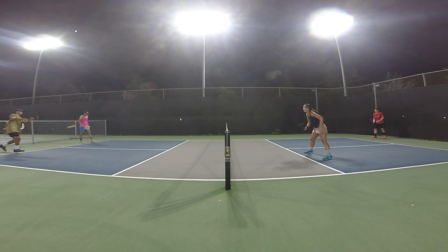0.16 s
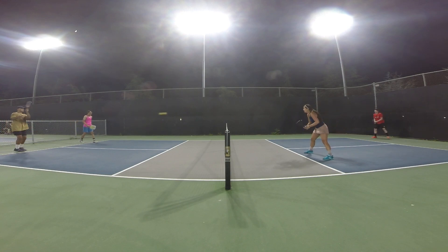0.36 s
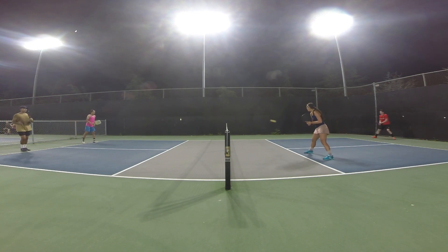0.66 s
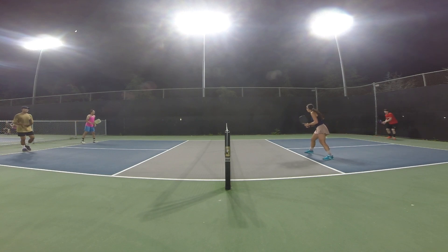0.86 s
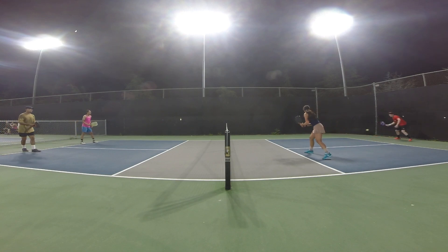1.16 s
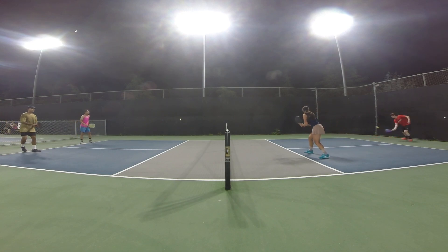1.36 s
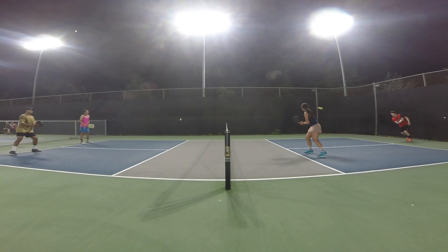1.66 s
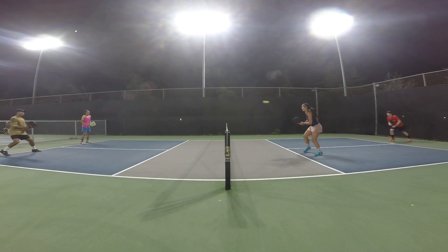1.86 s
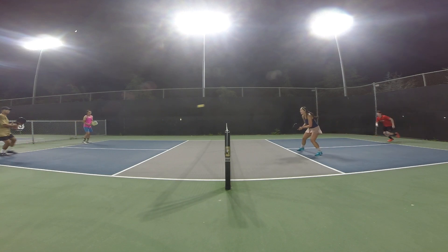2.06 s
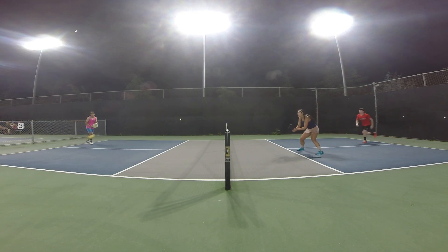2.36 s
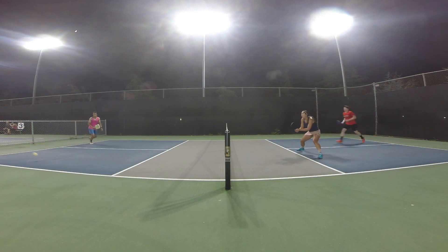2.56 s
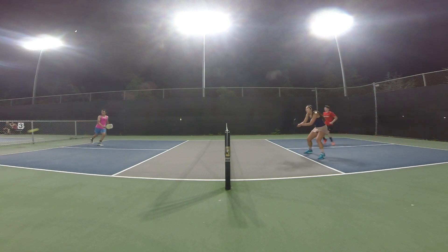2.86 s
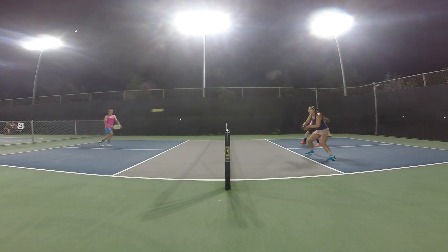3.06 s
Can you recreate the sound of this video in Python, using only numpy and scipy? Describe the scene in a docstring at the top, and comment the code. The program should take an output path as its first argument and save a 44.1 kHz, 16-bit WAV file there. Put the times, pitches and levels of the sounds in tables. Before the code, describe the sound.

A pickleball rally on a fenced outdoor court. A dull bounce at 0.13 s leads into a sharp hollow paddle pock at 0.19, with wall echoes; further pocks come at 1.43 and 2.9, the last bright and ringing. Shoes scuff lightly throughout, footfalls tap from 1.1, strongest at 2.77, small clicks near 1.0 and 2.6, short squeaks after 2.87. A low engine hum fades, wavering, under quiet night air.

```python
"""A fenced outdoor court at night, with a pickleball rally over the fading hum of what is probably a distant engine.
The engine is a firing tone, weaker lines and throbbing rumble; the night air is shaped noise.
Each ball impact is a hard kick, a release and a short ring of the ball or of that paddle's own modes.
Filtered copies come back from fences and walls, and a diffuse noise tail spreads round the court.
Between the hits, shoes tap (struck resonances), scuff (sliding hiss) and squeak (falling chirps), and ticks click."""
import sys
import numpy as np
from scipy import signal
from scipy.fft import rfft, irfft
from scipy.io import wavfile
from scipy.ndimage import uniform_filter1d

SR = 44100
rng = np.random.default_rng(int(sys.argv[2]) if len(sys.argv) > 2 else 0)


def dump_mix(stems):
    """Bounce the given channels to the path in sys.argv[1] as a 16-bit WAV at rate SR."""
    frames = np.atleast_2d(stems).T  # one column per channel
    limited = np.clip(frames, -1, 1)  # hard clip at full scale
    pcm = np.round(limited * 32767).astype(np.int16)
    wavfile.write(sys.argv[1], SR, pcm)


N = 141120  # samples, 3.2 s
T = np.arange(N) / SR
TOP_HZ = 15400  # upper edge of the whole sound


def amp(db):
    """Decibels to gain."""
    return 10 ** (np.asarray(db) / 20)


def unit(x):
    """Scale to rms 1."""
    return x / np.sqrt(np.mean(x ** 2))


def noise():
    """White noise."""
    return rng.standard_normal(N)


def fade(t60):
    """Exponential decay that falls 60 dB in t60 seconds."""
    return np.exp(-np.log(1000) * T / t60)


def band(x, hz, width):
    """Resonance with gain 1 at its centre."""
    g = np.tan(np.pi * min(hz, SR / 2 - 2000) / SR)
    k = width / hz
    numerator = [g * k, 0, -g * k]
    denominator = [1 + g * k + g * g, 2 * (g * g - 1), 1 - g * k + g * g]
    return signal.lfilter(numerator, denominator, x)


def soften(x, hz, order=2):
    """Low-pass."""
    return signal.sosfilt(signal.butter(order, min(hz, TOP_HZ), fs=SR, output="sos"), x)


def delay(x, s):
    """The sound, s seconds later."""
    return np.concatenate([np.zeros(max(int(s * SR), 0)), x])[:N]


def walk(rate):
    """Smooth random wander with a spread near 1, heading for a new value rate times a second."""
    k = max(int(SR / rate), 1)
    return uniform_filter1d(np.repeat(rng.standard_normal(N // k + 1), k), k)[:N]


def coloured(points):
    """Noise of rms 1 with a spectrum of (Hz, dB) points."""
    hz, db = np.array(points).T
    f = np.maximum(np.fft.rfftfreq(N, 1 / SR), 1)
    gain = amp(np.interp(np.log(f), np.log(hz), db))
    return unit(irfft(rfft(noise()) * gain, N))


# pitch glide of the engine: time_s, firing_hz
ENGINE_PITCH = [(0, 132.7), (.6, 131.2), (1.2, 132.7), (1.55, 128.7), (2.4, 129.8), (2.75, 125.5),
                (3.2, 125.1)]
# loudness ride of the engine: time_s, tone_db, lines_and_rumble_db
ENGINE_LEVEL = [(0, 1.5, 4.5), (.45, 2, 4), (.75, 1, 0.5), (1.15, -2, 1), (1.55, -6, -11), (2.0, -9.5, -11),
                (2.25, -3, -6), (2.55, -9.5, -6), (2.8, -2, -7), (3.2, -5.5, -9.5)]
# weaker exhaust lines: multiple of the eight-firing cycle, level_db
EXHAUST_LINES = [(5, -43), (11, -44.5), (12, -48.5), (13, -42.5), (17, -47), (19, -59), (25, -52)]
# spectral shape of the exhaust rumble: freq_hz, relative_db
EXHAUST_COLOUR = [(30, -16), (70, -10), (150, -1.5), (280, 2.5), (420, -4), (700, -14), (1500, -34.5),
                  (4000, -54)]
FIRING_DB, RUMBLE_DB = -34, -39.5  # before the loudness ride


def engine():
    """The firing tone, weaker wavering lines on the engine cycle, and rumble that throbs with the firings."""
    time_s, tone_db, rest_db = np.array(ENGINE_LEVEL).T
    firing_hz = np.interp(T, *np.array(ENGINE_PITCH).T)
    firing = 2 * np.pi * np.cumsum(firing_hz) / SR
    cycle = firing / 8
    tone = amp(FIRING_DB + 1.66 * walk(12)) * np.sqrt(2) * np.sin(firing + 0.027 * walk(27))
    lines = np.zeros(N)
    for multiple, db in EXHAUST_LINES:
        level = amp(db + 3.7 * walk(6.87))
        phase = 0.57 * walk(8.3) + rng.uniform(0, 2 * np.pi)
        lines += level * np.sqrt(2) * np.sin(round(multiple) * cycle + phase)
    rumble = amp(RUMBLE_DB) * coloured(EXHAUST_COLOUR) * (1 + 0.3 * np.sin(firing))
    tone_ride = amp(np.interp(T, time_s, tone_db))
    rest_ride = amp(np.interp(T, time_s, rest_db))
    return tone * tone_ride + (lines + rumble) * rest_ride


# spectral shape of the night air: freq_hz, relative_db
AIR_COLOUR = [(15, -55), (25, -3), (137, -0.5), (175, -4), (285, -8), (405, -17), (1070, -18),
              (3720, -34.5), (11600, -51), (14400, -56), (16000, -86)]


def night_air():
    """Steady noise, weighted to the lows."""
    return amp(-40.5) * coloured(AIR_COLOUR)


KNOCK_WIDTH = 0.99  # share of the knock's pitch
CRACK_T60_S, CRACK_HZ, CRACK_WIDTH_HZ = 0.015, 5400, 3850
GROUND_LAG_S, GROUND_DB = 0.0025, -16.5  # the court mirrors each impact
KNOCK_SPREAD_DB, SKIN_SPREAD_DB = 0.5, -10  # shares that spread round the court


def impact(modes, knock_db, knock_hz, contact_ms, release_db, ring_db, crack_db, top_hz):
    """The ball kicks what it strikes and kicks back as it leaves; face (first mode) and skin (the rest) ring.

    Returns the direct sound with its ground reflection, and what spreads round the court."""
    kick = soften(signal.unit_impulse(N), top_hz, order=1)
    knock = amp(knock_db) * band(kick, knock_hz, KNOCK_WIDTH * knock_hz)
    release = -amp(release_db) * delay(knock, contact_ms / 1000)
    face, *skin_modes = [amp(ring_db + db) * band(kick, hz, width) for hz, width, db in modes]
    skin = sum(skin_modes)
    crack = amp(crack_db) * band(noise() * fade(CRACK_T60_S), CRACK_HZ, CRACK_WIDTH_HZ)
    pock = knock + release + face + skin + crack
    direct = pock + amp(GROUND_DB) * delay(pock, GROUND_LAG_S)
    spread = amp(KNOCK_SPREAD_DB) * knock + amp(SKIN_SPREAD_DB) * skin + face + crack
    return direct, spread


# ball impacts, a bounce on the court and three paddle hits: start_s, knock_db, knock_hz, contact_ms,
# release_db (relative to the knock), ring_db, crack_db, top_hz, tail_db
IMPACTS = [(0.1306, 19, 350, 0.7, 7, 24.5, -29, 2400, 11.5),
           (0.1919, 28, 443, 1.68, -13.5, 28, -9, 12100, -2),
           (1.4318, 29, 436, 2.264, -9.5, 29.5, -17, 8000, -1),
           (2.8984, 27.5, 404, 1.42, -13, 39.5, -6.5, 11000, -4)]
# modes of the bouncing ball and of each paddle, one list per impact: mode_hz, width_hz, level_db (on ring_db)
IMPACT_MODES = [
    [(1202, 50, 1), (2230, 53, -14)],
    [(984, 133, 2), (1670, 274, -1), (2520, 130, -6.5), (4350, 1500, -10.5), (7050, 400, -16)],
    [(1155, 47, -0.5), (810, 43, -8.5), (1650, 49, -16), (2670, 53, -15), (3800, 440, -18),
     (6500, 4500, -18)],
    [(1107, 120, -1.5), (1348, 245, -3.5), (1685, 150, -17), (2466, 120, -17.5), (3080, 99, -11),
     (5270, 900, -19.5), (7700, 150, -17.5)],
]


def rally():
    """Strikes each impact with its own modes; returns the hits, their court share and each pock from time 0."""
    hits, spread, pocks = np.zeros(N), np.zeros(N), []
    for modes, (start_s, *settings, tail_db) in zip(IMPACT_MODES, IMPACTS):
        pock, around = impact(modes, *settings)
        hits += delay(pock, start_s)
        spread += amp(tail_db) * delay(around, start_s)
        pocks.append(pock)
    return hits, spread, pocks


# reflections of the latest hit from fences and walls: arrival_s, level_db (relative to the hit), low_hz, high_hz
WALL_ECHOES = [(0.204, -16, 700, 2980), (0.224, -27.5, 1700, 13200), (0.2428, -10.5, 410, 2690),
               (0.303, -29, 935, 2870), (0.3285, -12, 650, 1390), (1.4531, -21, 2500, 13000),
               (1.497, -16, 1340, 2500), (1.529, -23, 1540, 4300), (1.604, -16.5, 250, 990),
               (2.9159, -17, 593, 1260), (2.9394, -20.5, 6700, 13000), (2.950, -31.5, 795, 1950),
               (3.02, -24, 520, 1090), (3.0419, -15, 252, 925)]


def echoes(pocks):
    """Fences and walls each throw back one band of the latest impact."""
    out = np.zeros(N)
    for arrival_s, db, low_hz, high_hz in WALL_ECHOES:
        latest = sum(row[0] < arrival_s for row in IMPACTS) - 1
        edges = sorted([low_hz, min(high_hz, TOP_HZ)])
        wall = signal.butter(3, edges, "band", fs=SR, output="sos")
        out += amp(db) * delay(signal.sosfilt(wall, pocks[latest]), arrival_s)
    return out


TAIL_RISE_S, TAIL_GRAIN_DB = 0.001, 3
# diffuse court tail by band: centre_hz, level_db, t60_s (before the source's t60 share)
COURT_TAIL = [(320, -12.5, 0.26), (1006, -11, 1.2), (2160, -9.5, 0.79), (4180, -17.5, 0.39),
              (9450, -15.5, 0.44), (13500, -10.5, 0.26)]


def court(x, t60_share):
    """Many small uneven reflections, longest in the midrange, as decaying bands of noise."""
    scatter = amp(TAIL_GRAIN_DB * walk(300)) * (1 - np.exp(-T / TAIL_RISE_S))
    response = np.zeros(N)
    for hz, db, t60 in COURT_TAIL:
        envelope = scatter * fade(t60 * t60_share)
        grain = band(band(noise() * envelope, hz, hz), hz, hz)
        response += amp(db) * grain / np.sqrt(np.sum(envelope ** 2))  # envelope energy 1
    return signal.fftconvolve(x, response)[:N]


SCUFF_ATTACK_S, SCUFF_RELEASE_S, SCUFF_GRAIN_DB = 0.016, 0.0088, 2
SCUFF_FALL = 1.05  # the hiss starts this factor above its centre and ends as far below
SCUFF_WIDTH_HZ, SCUFF_CENTRE_HZ = 3900, 5000  # width at this centre; low scrapes are narrow, high hisses broad
# soles sliding on the court: start_s, length_s, level_db, centre_hz
SOLE_SLIDES = [(0.433, 0.025, -43, 6670), (0.452, 0.065, -45.5, 3060), (0.753, 0.036, -53.5, 8600),
               (0.805, 0.13, -50.5, 2690), (0.92, 0.16, -55.5, 4440), (1.33, 0.27, -59.5, 4530),
               (1.59, .11, -61, 5500), (1.842, 0.033, -55, 6860), (2.069, 0.064, -51.5, 4700),
               (2.127, 0.084, -48.5, 3930), (2.558, 0.029, -50.5, 8000), (2.736, 0.028, -39, 6200),
               (2.756, 0.25, -49, 6000), (3.012, 0.19, -50.5, 6000), (3.086, 0.097, -43.5, 3800)]


def hiss(hz):
    """Friction noise of rms 1 around one pitch."""
    width = SCUFF_WIDTH_HZ * (hz / SCUFF_CENTRE_HZ) ** 2
    return unit(band(band(noise(), hz, width), hz, 4 * hz))


def scuffs():
    """Grainy friction that swells, darkens as the sole slows and dies away."""
    out = np.zeros(N)
    for start_s, length_s, db, hz in SOLE_SLIDES:
        swell = np.clip((T - start_s) / SCUFF_ATTACK_S, 0, 1)
        past_end_s = np.maximum(T - start_s - length_s + SCUFF_ATTACK_S, 0)
        envelope = swell * np.exp(-past_end_s / SCUFF_RELEASE_S)
        slowed = np.clip((T - start_s) / length_s, 0, 1)
        fast, slow = hiss(hz * SCUFF_FALL), hiss(hz / SCUFF_FALL)
        out += amp(db) * envelope * (np.sqrt(1 - slowed) * fast + np.sqrt(slowed) * slow)
    return out * amp(SCUFF_GRAIN_DB * walk(700) + 2 * walk(48))


CLICK_T60_S, CLICK_RING_HZ = 0.012, 2390
# small sharp clicks: start_s, level_db, ring_db (relative to the tick)
TICKS = [(1.02, -25, 9.5), (1.139, -41, 19), (2.6155, -27.5, 15.5)]


def clicks():
    """Bright noise ticks, each with a brief ring in a narrow band."""
    out = np.zeros(N)
    for start_s, db, ring_db in TICKS:
        tick = noise() * fade(CLICK_T60_S)
        ring = amp(ring_db) * band(tick, CLICK_RING_HZ, 240)
        out += amp(db) * delay(band(tick, 2100, 12000) + ring, start_s)
    return out


THUD_LAG_S, THUD_WIDTH, SLAP_T60_S = 0.001998, 0.34, 0.023  # width as a share of the thud's pitch
SOLE_HZ, SOLE_WIDTH_HZ, SOLE_DB = 537, 48, -11  # hollow clop of the sole, relative to the thud
THUMP_HZ, THUMP_WIDTH_HZ = 205, 104
# footfalls and ball bounces: start_s, thud_db, thud_hz, slap_db, slap_hz, thump_db
FOOTFALLS = [(1.082, -7.5, 885, -42, 1800, -3), (1.4002, 12.5, 650, -31.5, 2360, 3),
             (1.805, 9, 704, -34, 2550, 9), (1.833, 9.5, 653, -36.5, 2270, 9),
             (2.151, 11.5, 555, -29.5, 1430, 13), (2.179, 3, 554, -48, 1110, -9),
             (2.391, 5.5, 590, -39, 1900, -1), (2.614, 2, 510, -52, 2400, 3),
             (2.7716, 18.5, 574, -24.5, 2780, 26), (2.808, -10, 400, -31.5, 1700, 13.5)]


def steps():
    """A short slap on the hard court, then a dull thud with a hollow clop and the low thump of the weight."""
    out, kick = np.zeros(N), signal.unit_impulse(N)
    clop = band(band(kick, SOLE_HZ, SOLE_WIDTH_HZ), SOLE_HZ, 2 * SOLE_HZ)
    thump = band(band(kick, THUMP_HZ, THUMP_WIDTH_HZ), THUMP_HZ, 3 * THUMP_HZ)
    for start_s, thud_db, thud_hz, slap_db, slap_hz, thump_db in FOOTFALLS:
        thud = band(band(kick, thud_hz, THUD_WIDTH * thud_hz), thud_hz, 3 * thud_hz)
        thud += amp(SOLE_DB) * clop
        hard_noise = band(band(noise(), slap_hz, 0.5 * slap_hz), slap_hz, 1.06 * slap_hz)
        slap = amp(slap_db) * unit(hard_noise) * fade(SLAP_T60_S)
        weight = amp(thud_db) * thud + amp(thump_db) * thump
        out += delay(slap - delay(weight, THUD_LAG_S), start_s)
    return out


# rubber squeaks: start_s, length_s, start_hz, end_hz, level_db
RUBBER_SQUEAKS = [(2.874, 0.027, 2850, 2700, -37), (3.082, 0.017, 3350, 2770, -33.5),
                  (3.156, 0.0088, 2930, 2840, -24)]


def squeaks():
    """Rubber sticks and slips in a short falling chirp with a jittery pitch."""
    out = np.zeros(N)
    for start_s, length_s, start_hz, end_hz, db in RUBBER_SQUEAKS:
        progress = np.clip((T - start_s) / length_s, 0, 1)
        glide = start_hz + (end_hz - start_hz) * progress
        hz = glide * (1 + 0.028 * walk(900))
        out += amp(db) * np.sin(np.pi * progress) * np.sin(2 * np.pi * np.cumsum(hz) / SR)
    return out


SHOE_TAIL_DB, SHOE_T60_SHARE = 6, 0.92  # court tail of the shoes


def scene():
    """Rally and footwork in the court, over engine and night air; sounds at ground level die away sooner."""
    background = engine() + night_air()
    hits, spread, pocks = rally()
    shoes = scuffs() + steps() + squeaks()
    tail = court(spread, 1) + amp(SHOE_TAIL_DB) * court(shoes, SHOE_T60_SHARE)
    return (background + hits + echoes(pocks) + tail + shoes + clicks())[None]


DRIVE_DB, MIC_TOP_HZ = -1.5, 12800


def record(dry):
    """The camera flattens the loudest peaks, rolls off the treble and cuts the top."""
    clipped = np.clip(dry * amp(DRIVE_DB), -1, 1)
    rolled_off = soften(clipped, MIC_TOP_HZ)
    steep_cut = signal.ellip(8, .2, 80, TOP_HZ, fs=SR, output="sos")
    return signal.sosfilt(steep_cut, rolled_off)


dry = scene()
out = record(dry)
dump_mix(out)
```